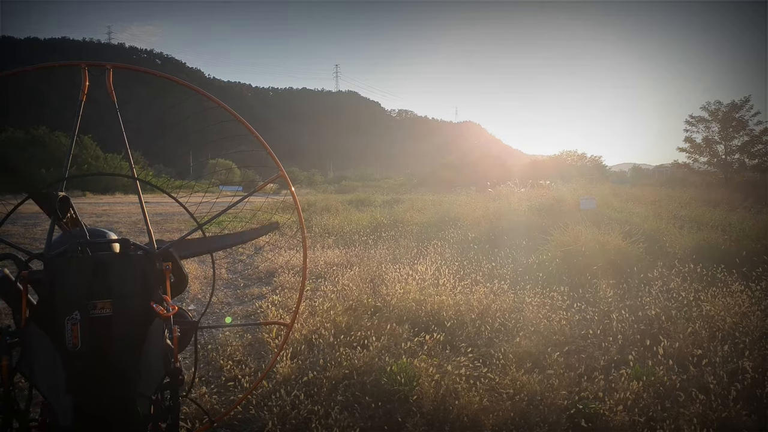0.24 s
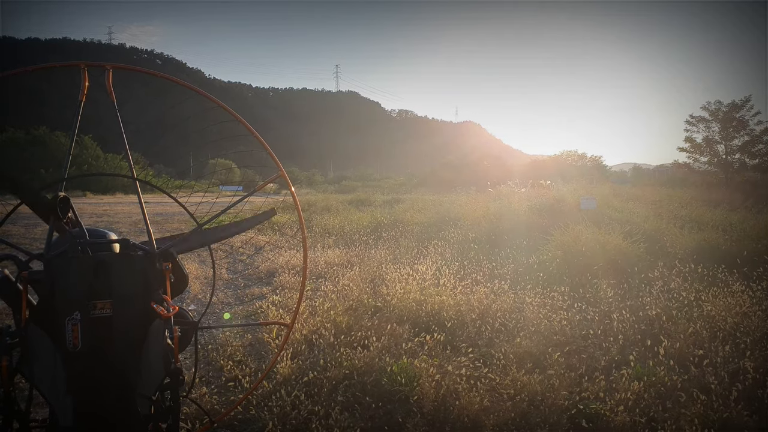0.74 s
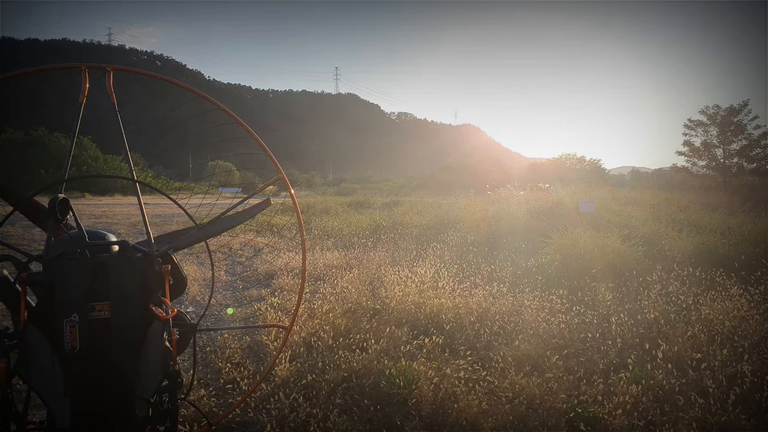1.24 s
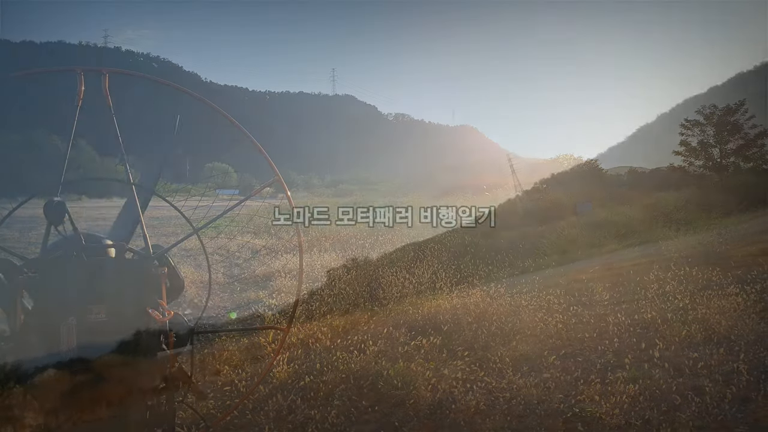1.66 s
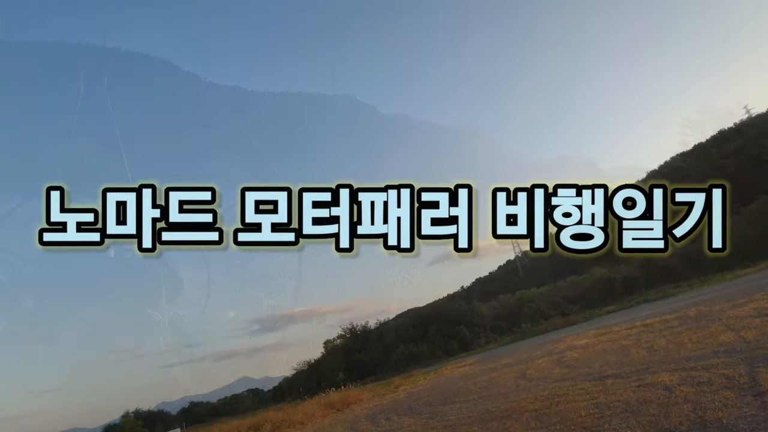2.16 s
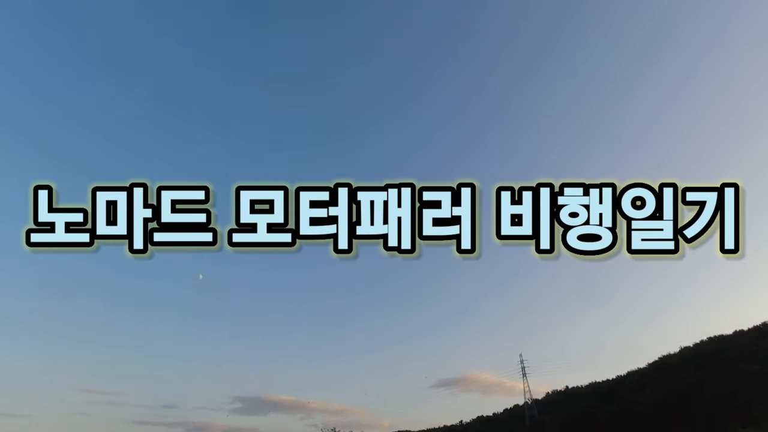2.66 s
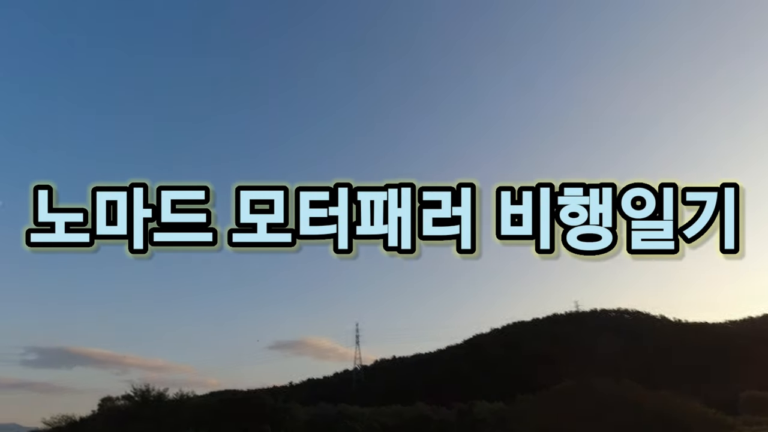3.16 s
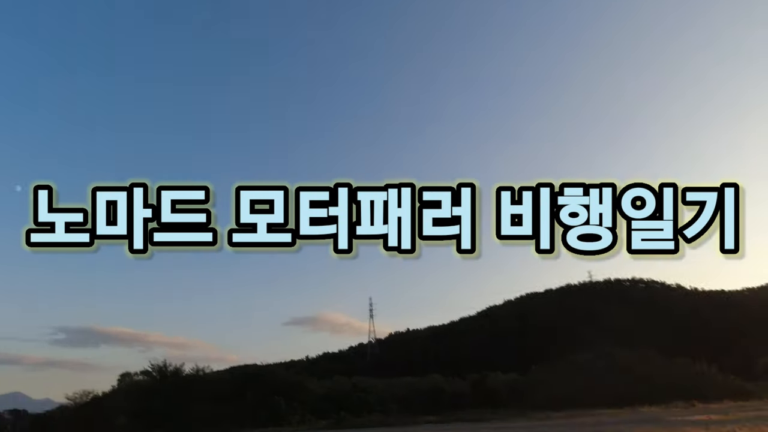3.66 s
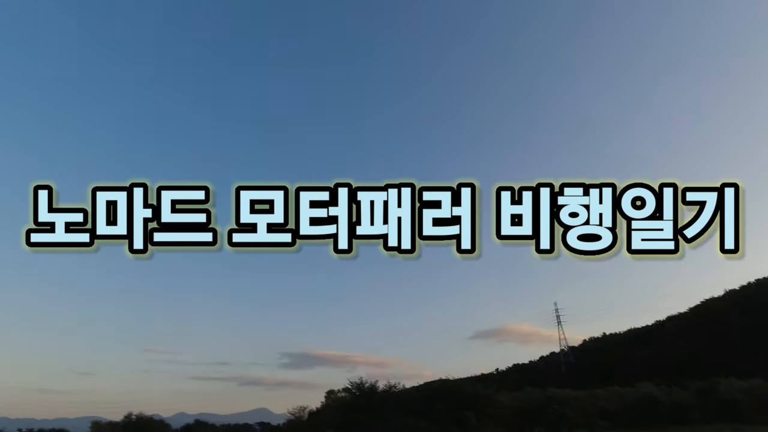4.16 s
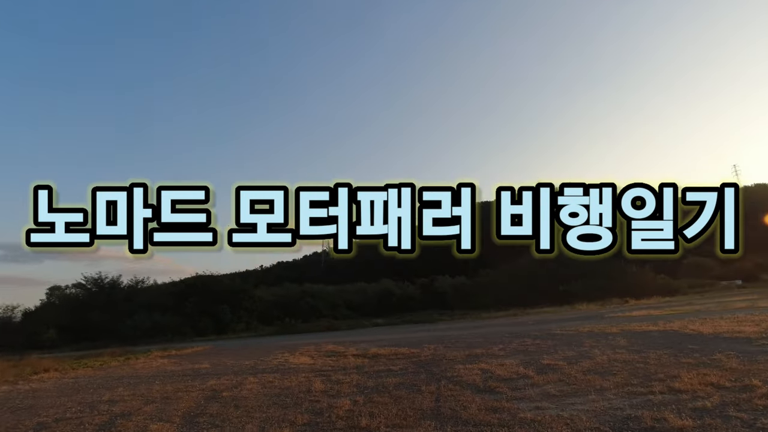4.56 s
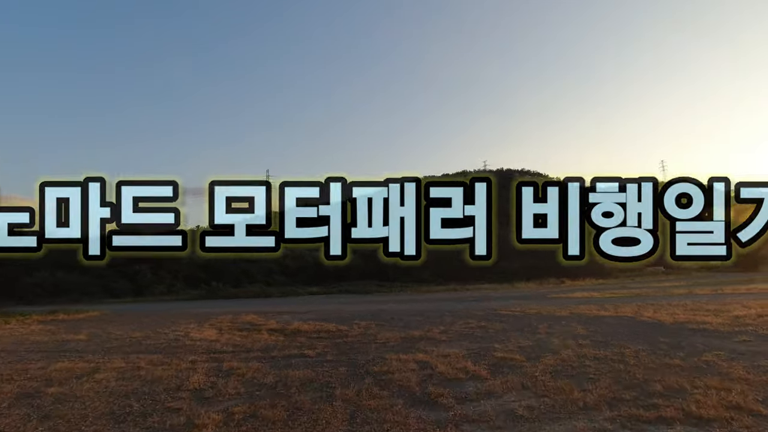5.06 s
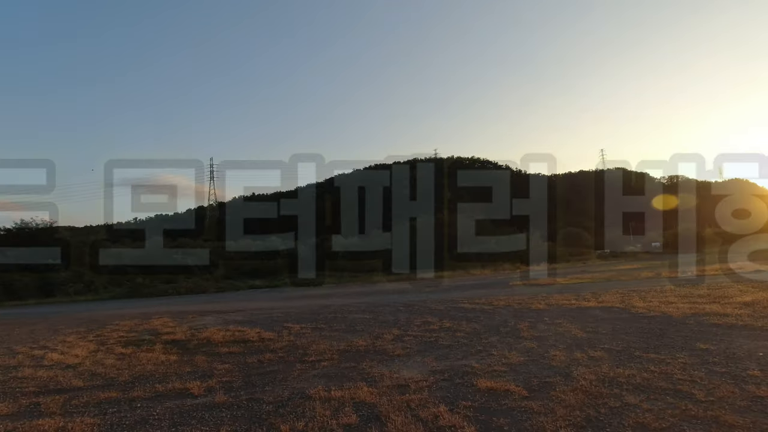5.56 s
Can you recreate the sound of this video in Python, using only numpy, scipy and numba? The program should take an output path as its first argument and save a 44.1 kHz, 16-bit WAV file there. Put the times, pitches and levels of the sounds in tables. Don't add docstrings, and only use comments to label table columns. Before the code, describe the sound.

Close stereo sound of a powered paraglider motor: first a loose, clattering idle with uneven bangs ringing in the exhaust, nearer the left. Around a second and a half it blends into another engine spooling up, its buzzing exhaust and propeller tones slipping against each other. By three seconds it is a loud, rough drone with crackle, airy hiss and gusts, lasting to the end in dry open air.

```python
import sys
import numpy as np
from scipy import signal
from scipy.fft import rfft, irfft, next_fast_len
from scipy.io import wavfile
from scipy.ndimage import uniform_filter1d
from numba import njit

SR = 44100
rng = np.random.default_rng(int(sys.argv[2]) if len(sys.argv) > 2 else 0)


def output_pcm(signal):
    pcm = np.clip(np.atleast_2d(signal).T, -1, 1) * 32767
    wavfile.write(sys.argv[1], SR, np.round(pcm).astype(np.int16))


def gain_from_db(level_db):
    decades = np.asarray(level_db, float) / 20
    return 10 ** decades


N = 256220
T = np.arange(N) / SR

# t/s, rate/Hz
FIRING_RATE_HZ = [(1.5, 91.3), (1.75, 93.5), (2, 97.8), (2.38, 106.4), (2.62, 116), (2.88, 124),
                  (3.12, 126.3), (3.25, 125.9), (3.42, 124.2), (3.62, 124.6), (3.75, 125.9), (4, 126.8),
                  (4.25, 131.7), (4.38, 132.8), (4.75, 135.2), (5, 135.8), (5.25, 133.7), (5.81, 134.6)]
# t/s, rate/Hz
BELT_SLIP_HZ = [(2, 7.65), (2.5, 7.8), (2.8, 7.16), (3.3, 8), (3.9, 7.03), (4.55, .58), (5.1, 4.16),
                (5.81, 5.52)]
# t/s, share of full-throttle colour/1
THROTTLE = [(2, -0.45), (3, 0.22), (4, 0.29), (4.6, 0.59), (5.81, 1.02)]
# t/s, share/1
SPOOL = [(2.2, 0.79), (2.5, 0.74), (2.75, 0.83), (3, 0.14)]
# f/Hz, level/dB
SPOOL_COLOUR_DB = [(220, -0.5), (330, 2.5), (480, -11), (600, -7), (700, -3.5), (780, 3.5), (900, -10.5),
                   (1100, -5), (2000, -1)]
# t/s, level/dB
DRONE_DB = [(1.6, -37), (1.82, -25.5), (1.95, -25), (2.03, -18.5), (2.5, -14.5), (2.82, -7.5), (2.89, 0.5),
            (3.1, -8), (3.7, -6.5), (3.92, -10.5), (4.08, -11.5), (4.26, -6.5), (4.67, -14), (4.83, -7.5),
            (5.02, -17), (5.08, -10), (5.71, -11), (5.81, -12)]
# t/s, roar level/dB, buzz over roar/dB
EFFORT_DB = [(1.35, -73, -14), (1.6, -49, -9), (1.9, -37.5, -4.5), (2.1, -39.5, 0.5), (2.3, -30.5, -1.5),
             (2.75, -24, -3), (2.9, -17.5, -3.5), (3.1, -16.5, -5.5), (3.3, -17.5, -7), (3.9, -16.5, -5),
             (4.85, -16.5, -4), (5, -15, -5), (5.81, -14.5, -11)]
# t/s, level/dB
FLIGHT_IN_DB = [(1.35, -40), (1.6, -2), (1.7, -1)]
# t/s, lag of left side/samples
HEADING_LAG = [(1.5, -18.5), (3, 4), (4, 3), (4.6, 2), (5.2, 0), (5.81, 6)]
# f/Hz, level/dB
EXHAUST_LOW_DB = [(200, 1.5), (250, 1.5), (375, -15.5), (440, 1), (500, 2.5), (630, -13.5), (900, -29),
                  (1400, -19.5), (2000, -18.5), (2500, -26.5), (4000, -32)]
# f/Hz, level/dB
EXHAUST_FULL_DB = [(200, -1.5), (270, 0.5), (400, -5), (540, 1.5), (800, -17), (1100, -2.5), (1500, -7),
                   (2200, -3), (2600, -38), (4000, -26)]
# f/Hz, level/dB
BLADE_COLOUR_DB = [(100, -11), (250, -14), (360, -7), (480, -6), (600, 1), (800, -8), (1000, 0.5),
                   (1300, -19.5), (1700, -8.5), (2400, -43), (4000, -51)]
# t/s, level/dB, length/s, f/Hz
CRACK_BURSTS = [
    (3.135, -19, 0.0075, 2540),
    (3.207, -31, 0.033, 3300),
    (3.29, -27, .03, 2700),
    (3.375, -25, 0.056, 2300),
    (3.707, -23, .05, 2140),
    (3.777, -22.5, 0.03, 2840),
    (3.975, -25, 0.081, 2300),
]
RASP_HZ = [990, 1440, 1900, 2300]
# t/s, peak/dB, pipe ring f/Hz, thump level/dB
FIRINGS = [(0.127, -10.5, 413, -4), (0.261, -19, 474, -4), (0.376, -11.5, 420, -7), (0.531, -24, 372, -12),
           (0.614, -13.5, 417, -2), (0.747, -39, 342, -6.0), (0.774, -12, 450, -3), (0.928, -12.5, 408, -4),
           (1.092, -10.5, 420, -7), (1.235, -24, 345, -15), (1.261, -19, 478, 1), (1.364, -17.5, 420, -11),
           (1.47, -14, 410, -4), (1.596, -30, 375, -1), (1.648, -26.5, 387, 2), (1.73, -23, 405, -11),
           (1.877, -18, 400, -12.5), (2.027, -22.5, 418, -4)]
TURNS_TO_FIRING = [5, 5, 4, 6, 3, 5, 1, 6, 6, 6, 1, 4, 4, 5, 2, 3, 5, 6]
# f/Hz, level/dB, t60/s, delay/ms
PIPE_MODES = [(944, -5.5, 0.045, 1.67), (1316, -6.5, 0.048, 2.14), (1455, 2.5, 0.053, 3.13),
              (1210, -43, 0.016, 2.2), (613, -18, 0.078, 1.7), (2300, -17, 0.053, 2.8),
              (2810, -24.5, 0.085, 2.4), (4020, -22, 0.038, 3.2)]
# f/Hz, width/Hz, level/dB
EXHAUST_BOX = [(96.3, 44, 0), (167, 150, -24), (264.5, 22.6, -7.5), (497, 36, -32)]
# f/Hz, width/Hz, level/dB
CASING = [(987, 80, 2.5), (1330, 29, 4), (2170, 100, -13), (2950, 45, 2), (3686, 50, 11.5),
          (4150, 160, 4.5), (5650, 1400, -2.5), (6730, 180, 4.5)]
# f/Hz, level/dB
RATTLE_DB_AT_HZ = [(80, -21), (150, -9.5), (260, -5), (480, -8.5), (700, -12), (950, -13), (1600, -10.5),
                   (2050, -18.5), (2900, -21), (4600, -26.5), (5800, -24), (7400, -32.5), (11000, -28),
                   (13500, -33.5), (16000, -34)]
# t/s, level/dB
IDLE_LEVEL_DB = [(0, -1), (.1, -3.5), (.2, 0.5), (1.17, 1.5), (1.22, 1.5), (1.5, -3), (1.6, -4),
                 (2.2, -8.5), (2.35, -10), (2.45, -45)]
# t/s, swell/dB, length/s
BOOMS = [(.24, 5, 0.036), (.35, 6.5, 0.034), (.52, 3.5, .05), (.6, 1.5, 0.024), (.71, 3, 0.029),
         (.9, 1, .03), (1.06, 5, 0.06), (1.26, 4, 0.036), (1.9, 5, 0.14)]
# f/Hz, likeness/1
IDLE_SAME = [(100, .97), (500, 0.64), (2000, 0.62), (6000, 0.067), (15000, 0.078)]
# f/Hz, level/dB
IDLE_LEFT_DB = [(60, 0.5), (180, 2), (550, 4), (1650, 1), (4970, 4), (15000, 3.5)]
# f/Hz, density/dB per Hz
ROAR_LOW_DB = [(30, -23), (100, 4), (200, -5.5), (400, -13.5), (700, -1.5), (1200, -4), (2000, -8),
               (3000, -15.5), (5000, -23), (8000, -56)]
# f/Hz, density/dB per Hz
ROAR_FULL_DB = [(30, -12), (100, 1), (200, -4.5), (400, -7), (700, -6.5), (1200, -1.5), (2000, -3.5),
                (3000, -8.5), (5000, -15), (8000, -26)]
# f/Hz, likeness/1
ROAR_SAME = [(60, 0.2), (180, 0.2), (550, 1), (1650, 0.54), (4970, 0.016), (15000, 1)]
# f/Hz, level/dB
HISS_DB_AT_HZ = [(2500, -8), (4500, -8.5), (6500, -4), (7700, -5.5), (8800, -2), (10200, 3), (12000, -3),
                 (14000, -3.5), (16000, -8)]
# f/Hz, level/dB
HISS_SPOOL_DB = [(5000, 1), (7800, -5), (10000, 0), (13000, 1.5)]
# f/Hz, likeness/1
HISS_SAME = [(3000, 0.083), (6000, 0.27), (7500, 0.64), (10000, 0.19), (14000, 0.52)]
# t/s, hiss swell/dB, length/s
WASHES = [
    (2.2, 1, .25),
    (2.95, 1.5, 0.076),
    (4.65, 3, .18),
]
# t/s, swell/dB, length/s
GUSTS = [
    (3.12, 14, 0.087),
    (3.45, 8, 0.22),
    (4.5, 6, 0.16),
    (4.97, 9, 0.052),
    (5.45, 4, .15),
    (5.7, 20, 0.061),
]


def flight():
    speed_hz, slip_hz = curve(FIRING_RATE_HZ), curve(BELT_SLIP_HZ)
    roar_db, buzz_db = curves(EFFORT_DB)
    buzz, fired = exhaust_buzz(speed_hz)
    blades, passed = blade_buzz(speed_hz - slip_hz)
    stacks = gain_from_db(buzz_db) * buzz + gain_from_db(buzz_db - 2) * blades
    tones = np.sqrt(2) * gain_from_db(curve(DRONE_DB) + 1) * exhaust_drone(fired, passed, slip_hz)
    tones += gain_from_db(roar_db + 3.5) * stacks
    throb = evened(1 + 0.37 * np.exp(-((fired + 0.35) % 1) / 0.1) + 0.044 * np.cos(2 * np.pi * passed))
    air = roar(roar_db, throb) + hiss(roar_db, throb) + wind(roar_db)
    air += port_cracks(fired, roar_db) + port_edges(fired, roar_db)
    return (tones * gain_from_db(curve(FLIGHT_IN_DB)) + air) * (T > 1.35)


def exhaust_buzz(rate_hz):
    colour = blend(EXHAUST_LOW_DB, EXHAUST_FULL_DB)
    return stack(rate_hz, count=30, colour_db=lambda hz, t, k: colour(hz, t) - 99 * (k == 1),
                 jitter=0.00045, wander_db=6, apart_db=1.87)


def blade_buzz(rate_hz):
    cage_order, cage_db = 7, 6

    def colour_db(hz, t, k):
        return read(BLADE_COLOUR_DB, hz) + cage_db * (k == cage_order) * (t < 2.7)

    return stack(rate_hz, count=24, colour_db=colour_db, jitter=0.0019, wander_db=5.5, apart_db=2.2)


def exhaust_drone(fired, passed, slip_hz):
    chop_angle_turns, chop_db, db_per_slip_hz, spool_db = 0.26, -35, 2.57, -17
    sway = 0.2 * drift(9) - np.pi * curve(HEADING_LAG) * 130 / SR
    drone = np.cos(2 * np.pi * (fired - 0.12) + [sway, -sway])
    level_db = chop_db + db_per_slip_hz * slip_hz + spool_db * curve(SPOOL) * (T < 3)
    return drone + gain_from_db(level_db) * np.cos(2 * np.pi * (fired + passed - chop_angle_turns) + 1.38)


def port_cracks(fired, roar_db):
    cracks = np.exp(-((fired + 0.32) % 1) / 0.1) * rng.standard_normal(N)
    band = signal.butter(2, [1700, 3900], "band", fs=SR, output="sos")
    return gain_from_db(-11 + 1.73 * roar_db) * evened(signal.sosfilt(band, cracks))


def port_edges(fired, roar_db):
    rasp_db, waver_db = -9.5, 4
    port = np.diff((fired + 0.3544).astype(int), prepend=0)
    rasp = 0
    for hz in RASP_HZ:
        band = resonate(resonate(port, hz, 490), hz, 490)
        rasp = rasp + gain_from_db(waver_db * drift(11)) * evened(band)
    out = gain_from_db(roar_db + rasp_db) * np.clip(curve(THROTTLE) + 0.28, 0, 1) * evened(rasp)
    for s, db, length_s, hz in CRACK_BURSTS:
        crack = evened(resonate(resonate(port, hz, 670), hz, 750))
        out += swells([(s, gain_from_db(db), length_s)]) * crack
    return out


def idle():
    turns = crank_turns()
    strength = rng.standard_normal((int(turns[-1]) + 2, 2))
    level_db = curve(IDLE_LEVEL_DB)
    kick = 0
    for s, db, *_ in FIRINGS:
        kick = kick + gain_from_db(db + 11.5 - curve(IDLE_LEVEL_DB, s)) * np.exp(-abs(T - s) / 0.029) * (T > s)
    mix = gain_from_db(-31 + level_db + swells(BOOMS)) * chuff(turns, strength[:, 0])
    mix = mix + gain_from_db(-30.5 + level_db + 5.5 * kick) * rattle(turns, strength[:, 1])
    for s, *rest in FIRINGS:
        mix[:, round((s - 0.0002) * SR):][:, :4000] += firing(*rest)
    return place_left(mix) * (T < 2.45)


def crank_turns():
    spark_angle_turns, idle_turns_per_s = 0.6, 38
    sparks_s = np.transpose(FIRINGS)[0]
    angles = np.cumsum(TURNS_TO_FIRING) + spark_angle_turns
    ends = angles[[0, -1]] + idle_turns_per_s * (T[[0, -1]] - sparks_s[[0, -1]])
    return np.interp(T, [0, *sparks_s, T[-1]], [ends[0], *angles, ends[1]])


def firing(db, hz, thump_db):
    t = np.arange(4000) / SR
    bang = -np.sin(2 * np.pi * hz * t) * (t / 0.0021) ** 2 * np.exp(2 - 2 * t / 0.0024)
    for mode_hz, mode_db, t60_s, delay_ms in PIPE_MODES:
        late = np.maximum(t - delay_ms / 1000, 0)
        ring = gain_from_db(mode_db - 60 * late / t60_s) * np.sin(2 * np.pi * mode_hz * late)
        bang += ring * (1 - np.exp(-late / 0.00035))
    late = np.maximum(t - 0.0015, 0)
    bang -= gain_from_db(thump_db - 60 * late / 0.1) * np.sin(2 * np.pi * 95 * late)
    return gain_from_db(db) * bang


def chuff(turns, strength):
    puffs = np.diff((turns + 0.5).astype(int), prepend=0) * gain_from_db(2.7 * strength[turns.astype(int)])
    drive = evened(puffs) + 0.61 * rng.standard_normal(N)
    out = 0
    for hz, width_hz, db in EXHAUST_BOX:
        band = resonate(resonate(drive, hz, 1.35 * width_hz), hz, 1.35 * width_hz)
        out = out + gain_from_db(db) * evened(band)
    return evened(out)


def rattle(turns, strength):
    phase = turns % 1
    slap = 0.63 + 1.81 * gain_from_db(2.2 * strength[turns.astype(int)]) * np.exp(-phase / 0.29) + 0.077 * phase ** 4
    clatter = noise(lambda hz, t: read(RATTLE_DB_AT_HZ, hz) + 0 * t, IDLE_SAME,
                    patchy_db=2, flicker_db=1.2, start=0, stop=2.5)
    high = signal.lfilter(*signal.butter(2, 2500, "high", fs=SR), clatter)
    clatter = clatter + high * (0.96 * slap - 1)
    return clatter + sum(gain_from_db(db - 5) * resonate(clatter, hz, width_hz) for hz, width_hz, db in CASING)


def place_left(mix):
    lag_samples = 14
    size = next_fast_len(N)
    hz = np.fft.rfftfreq(size, 1 / SR)
    half = gain_from_db(read(IDLE_LEFT_DB, hz) / 2)
    sides = [half, np.exp(-2j * np.pi * hz * lag_samples / SR) / half]
    return irfft(rfft(mix, size) * sides, size)[:, :N]


def roar(roar_db, throb):
    air = noise(blend(ROAR_LOW_DB, ROAR_FULL_DB), ROAR_SAME, patchy_db=1.88, flicker_db=-1, start=1.35, stop=6)
    return gain_from_db(roar_db - 1.24) * air * throb


def hiss(roar_db, throb):
    air = noise(lambda hz, t: read(HISS_DB_AT_HZ, hz) + curve(SPOOL, t) * read(HISS_SPOOL_DB, hz),
                HISS_SAME, patchy_db=0.5, flicker_db=0.9, start=1.2, stop=6)
    return gain_from_db(-19 + 0.93 * roar_db + swells(WASHES) + 3) * air * throb ** 0.19


def wind(roar_db):
    gusts = rng.standard_normal((3, N))
    band = signal.butter(4, [34, 68], "band", fs=SR, output="sos")
    buffet = signal.sosfilt(band, gusts[0] + 0.55 * gusts[1:])
    return gain_from_db(-45 + 0.16 * roar_db + swells(GUSTS)) * evened(buffet)


def stack(rate_hz, count, colour_db, jitter, wander_db, apart_db):
    turns = np.cumsum(rate_hz * (1 + jitter * drift(40))) / SR
    t = np.arange(N // 256 + 2) * 256 / SR
    order = np.arange(1, count + 1)[:, None]
    hz = order * np.interp(t, T, rate_hz)
    knots = rng.standard_normal((5 * count, 120))
    wavers = [np.interp(t * 13, np.arange(120), v) for v in knots]
    both, *apart = np.reshape(wavers, (5, count, -1))
    spool = curve(SPOOL, t)
    wander = wander_db * np.minimum((order / 6.8) ** 3, 1.7) * np.minimum(both, 0.6) * (1 - 0.5 * spool)
    level_db = colour_db(hz, t, order) + spool * read(SPOOL_COLOUR_DB, hz) + wander
    level_db = level_db + apart_db * np.array(apart[:2])
    lag = hz * curve(HEADING_LAG, t) / SR
    phase = 2 * np.pi * (0.01193 * order ** 2 + np.array([-lag, lag]) / 2)
    phase = phase + apart_db / 11.7 * np.array(apart[2:])
    return overtones(turns, gain_from_db(level_db) * np.exp(1j * phase), 256), turns


@njit
def overtones(turns, gains, step):
    out = np.zeros((2, len(turns)))
    for n in range(len(turns)):
        spin, frame, share = np.exp(2j * np.pi * turns[n]), n // step, n % step / step
        power = spin
        for k in range(gains.shape[1]):
            for side in range(2):
                gain = gains[side, k, frame] * (1 - share) + gains[side, k, frame + 1] * share
                out[side, n] += (power * gain).real
            power *= spin
    return out


def noise(colour_db, same, patchy_db, flicker_db, start, stop):
    first, last = round(start * SR), min(round(stop * SR), N)
    frames, hz = (last - first) // 256 + 3, np.fft.rfftfreq(512, 1 / SR)
    a, b, c, d, patches = rng.standard_normal((frames, 257, 5)).T
    patches = evened(uniform_filter1d(uniform_filter1d(patches, size=3, axis=0), size=8, axis=1))
    flicker = evened(uniform_filter1d(rng.standard_normal(frames), size=3))
    like = np.clip(read(same, hz), -1, 1)[:, None]
    left = a + 1j * b
    z = np.array([left, like * left + np.sqrt(1 - like ** 2) * (c + 1j * d)])
    gain = gain_from_db(colour_db(hz[:, None], start + np.arange(frames) * 256 / SR))
    z *= gain / np.sqrt((gain ** 2).mean(0)) * gain_from_db(patchy_db * patches + flicker_db * flicker)
    sound = signal.istft(z, window="cosine", nperseg=512, noverlap=256)[1]
    out = np.zeros((2, N))
    out[:, first:last] = evened(sound[:, :last - first])
    return out


def blend(low, full):
    return lambda hz, t: read(low, hz) + curve(THROTTLE, t) * (read(full, hz) - read(low, hz))


def evened(x):
    return x / np.sqrt(np.mean(x ** 2) + 1e-20)


def read(points, hz):
    f, value = np.transpose(points)
    return np.interp(np.log(hz + 1), np.log(f + 1), value)


def curves(rows, t=T):
    s, *columns = np.transpose(rows)
    return [np.interp(t, s, c) for c in columns]


def curve(rows, t=T):
    return curves(rows, t)[0]


def swells(rows):
    return sum(height * np.exp(-((T - s) / length_s) ** 2) for s, height, length_s in rows)


def resonate(x, hz, width_hz):
    return signal.lfilter(*signal.iirpeak(hz, hz / width_hz, SR), x)


def drift(rate_hz):
    return np.interp(T * rate_hz, np.arange(400), rng.standard_normal(400))


def scene():
    return idle() + flight()


def roll_off(x):
    return signal.sosfilt(signal.butter(12, 16540, fs=SR, output="sos"), x)


def record(dry):
    ceiling, low_hz, edge_hz = 0.7, 14, 15750
    soft = dry / (1 + abs(dry / ceiling) ** 4) ** (1 / 4) + 0.08 * dry
    soft = signal.lfilter(*signal.butter(1, low_hz, "high", fs=SR), soft)
    lowpass = signal.firwin(301, edge_hz, window=("kaiser", 8), fs=SR)
    soft = signal.oaconvolve(soft, lowpass[None], "same")
    return roll_off(soft)


dry = scene()
out = record(dry)
output_pcm(out)
```